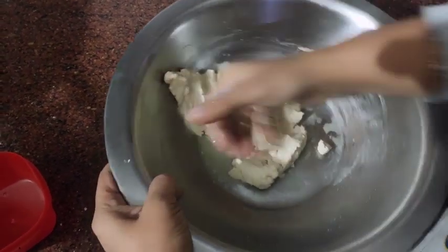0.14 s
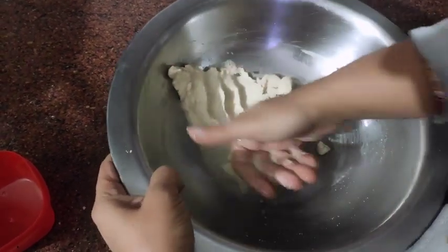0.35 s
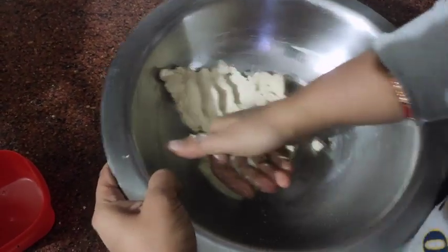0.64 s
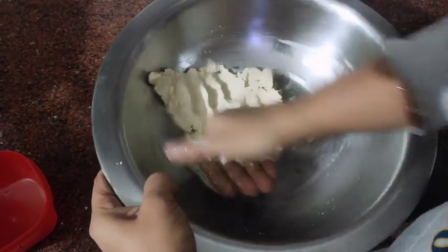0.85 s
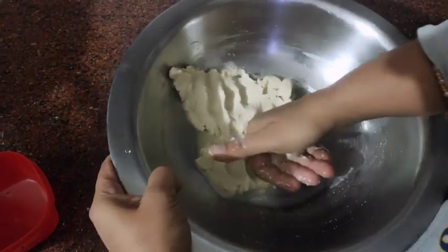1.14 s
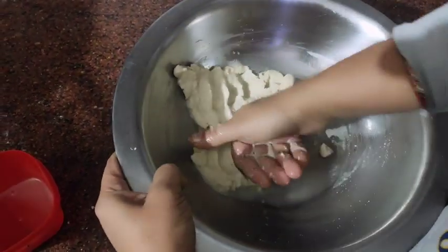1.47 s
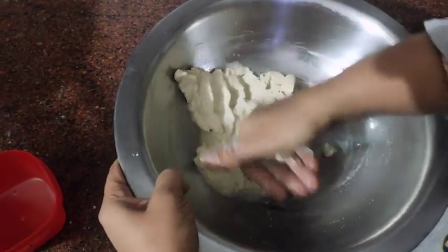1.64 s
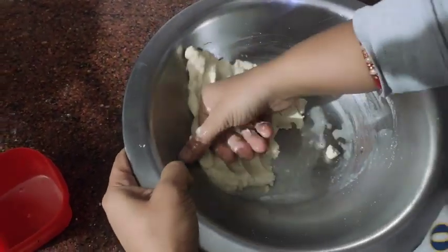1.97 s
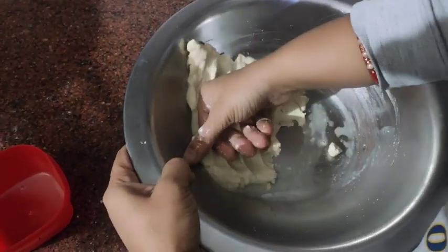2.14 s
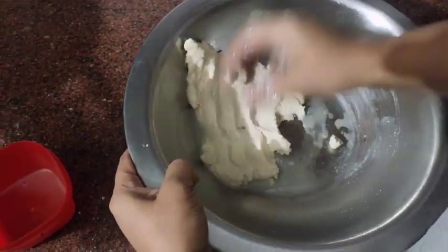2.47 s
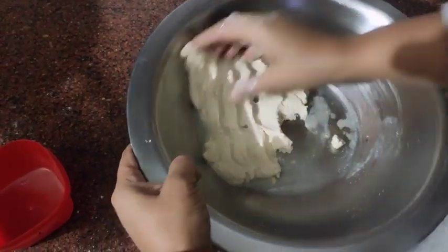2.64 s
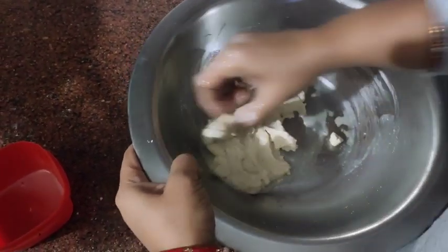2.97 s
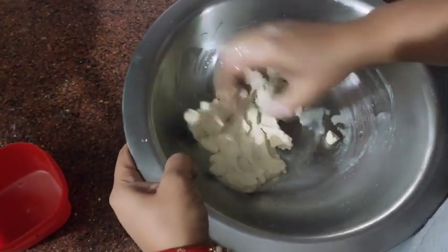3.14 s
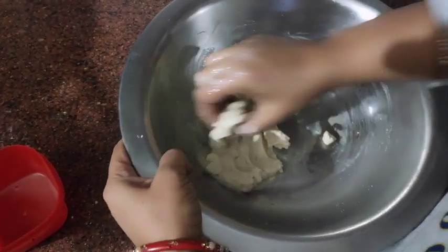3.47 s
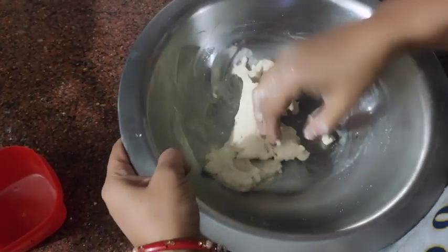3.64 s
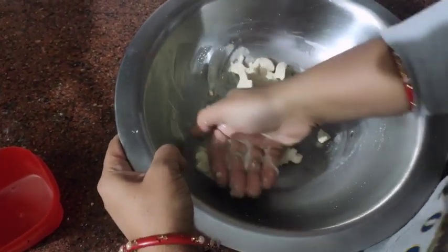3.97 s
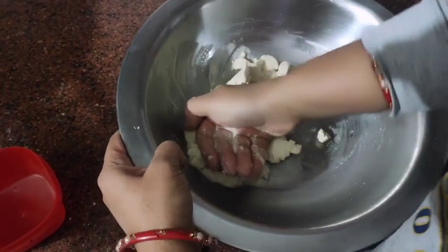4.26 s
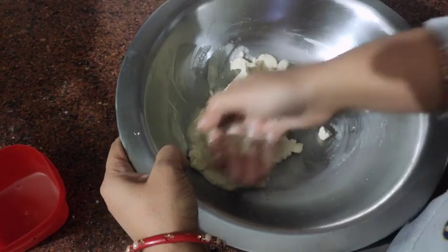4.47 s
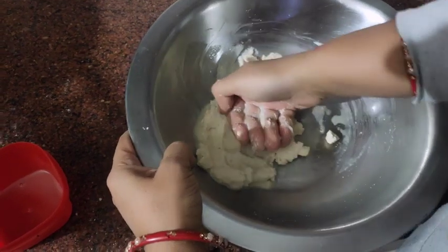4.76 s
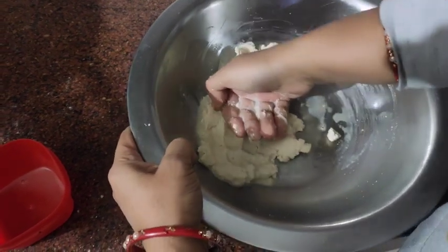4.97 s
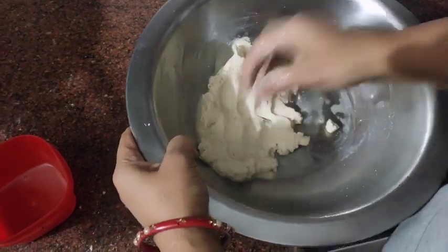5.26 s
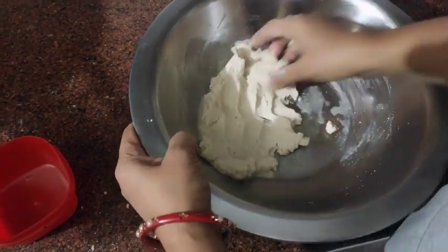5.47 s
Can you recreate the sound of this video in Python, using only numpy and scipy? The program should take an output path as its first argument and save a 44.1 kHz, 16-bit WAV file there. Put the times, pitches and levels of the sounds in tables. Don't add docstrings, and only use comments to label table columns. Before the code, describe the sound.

Bright, gritty back-and-forth scrubbing on steel about three strokes a second, with faint bowl skids, bangle ticks and one sharp wire snap.

```python
import sys
import numpy as np
from scipy import signal
from scipy.fft import rfft, irfft, next_fast_len
from scipy.io import wavfile
from scipy.ndimage import uniform_filter1d

SR = 44100
rng = np.random.default_rng(int(sys.argv[2]) if len(sys.argv) > 2 else 0)


def log_audio(samples):
    frames = np.atleast_2d(samples).T
    limited = np.clip(frames, -1, 1)
    pcm = np.round(limited * 32767).astype(np.int16)
    wavfile.write(sys.argv[1], SR, pcm)


def gain_from_db(level_db):
    decades = np.asarray(level_db, float) / 20
    return 10 ** decades


N = 247530

# (frequency [Hz], likeness [0-1])
ROOM_SAME = [(20, .92), (120, .75), (300, .7), (640, .35), (1400, 0)]


def evened(x):
    return x / np.sqrt(np.mean(x ** 2) + 1e-20)


def read(points, hz):
    f, value = np.transpose(points)
    return np.interp(np.log(hz + 1), np.log(f + 1), value)


def add(mix, s, sound):
    part = mix[round(s * SR):][:len(sound)]
    part += sound[:len(part)]


def band(x, lo_hz, hi_hz):
    return signal.sosfilt(signal.butter(2, [lo_hz, hi_hz], "band", fs=SR, output="sos"), x)


def high_pass(x, hz):
    return signal.sosfilt(signal.butter(4, hz, "high", fs=SR, output="sos"), x)


def drift(hz):
    noise = uniform_filter1d(rng.standard_normal(N), int(SR / hz / 4) + 1)
    return evened(signal.lfilter([1], [1, -np.exp(-2 * np.pi * hz / SR)], noise))


def resonate(x, modes, wander_db=0.):
    out = np.zeros_like(x)
    knots = rng.standard_normal((len(modes), 60))
    along = np.linspace(0, 59, N)
    for (hz, width, db), wander in zip(modes, knots):
        r = np.exp(-np.pi * width / SR)
        turn = r * np.cos(2 * np.pi * hz / SR)
        feed = np.interp(along, np.arange(60), gain_from_db(db + wander_db * wander))
        out += np.sqrt(2 * (1 - r * r)) * signal.lfilter([1, -turn], [1, -2 * turn, r * r], feed * x)
    return out


def ring(modes, rise_s):
    t = np.arange(SR // 4) / SR
    sines = sum(gain_from_db(db - 60 * t / t60) * np.sin(2 * np.pi * hz * t) for hz, db, t60 in modes)
    return sines * (1 - np.exp(-t / rise_s))


def patchy(patch_db, bins, frames):
    shape = (N // 128 + 6, 257)
    a, b, patch = rng.standard_normal(shape + (3,)).T
    patch = uniform_filter1d(patch, int(bins), 0)
    patch = evened(uniform_filter1d(patch, int(frames), 1))
    spectrum = (a + 1j * b) * gain_from_db(patch_db * patch)
    return evened(signal.istft(spectrum, nperseg=512, noverlap=384)[1][:N])


def coloured(x, gain):
    n = next_fast_len(N + 4096)
    return irfft(rfft(x, n) * gain(np.fft.rfftfreq(n, 1 / SR)), n)[..., :N]


def at_ports(shared, own, likeness):
    common = coloured(shared, lambda hz: read(likeness, hz))
    private = coloured(own, lambda hz: np.sqrt(1 - read(likeness, hz) ** 2))
    return np.array([shared, common + private])


def efforts(rows, rise_db_s, fall_db_s, rest_db):
    t = np.arange(0, N + 64, 64) / SR
    s, hold, db = np.transpose(rows)[:, :, None]
    early, late = np.maximum(s - t, 0), np.maximum(t - s - hold, 0)
    level = gain_from_db(db - rise_db_s * early - fall_db_s * late).sum(0)
    return np.interp(np.arange(N) / SR, t, level + gain_from_db(rest_db))


def tail(x, wet_db):
    # (frequency [Hz], t60 [s])
    echo_t60 = [(200, 0.33), (1000, 0.43), (4000, 0.18), (12000, 0.22)]
    grid = np.arange(200, SR // 2, 20)
    at = grid + rng.integers(0, 20, (2, len(grid)))
    taps = np.zeros((2, SR // 2 + 40))
    np.put_along_axis(taps, at, rng.choice([-1., 1.], at.shape), 1)
    hz, t, z = signal.stft(taps, SR, nperseg=256)
    same = read(ROOM_SAME, hz)[:, None]
    z[1] = same * z[0] + np.sqrt(1 - same ** 2) * z[1]
    fade = gain_from_db(-60 * t / read(echo_t60, hz)[:, None])
    decay = signal.istft(z * fade, SR, nperseg=256)[1]
    echo = signal.fftconvolve(x[None], decay / np.linalg.norm(decay[0]), axes=1)[:, :N]
    return gain_from_db(wet_db) * echo


def place(x, pan_db, lag, wet_db):
    left = gain_from_db(pan_db / 2) * np.roll(x, int(lag))
    right = gain_from_db(-pan_db / 2) * x
    return np.array([left, right]) + tail(x, wet_db)


def scouring(grit_db=-1.0, wet_db=-12, hand_echo=0.45):
    # (frequency [Hz], density [dB per Hz])
    scratch = [(530, -83), (900, -18), (1400, -24), (1580, -8.5), (1720, -13.5), (3310, -5.5), (3600, -7),
               (4010, -4), (4460, -2.5), (5280, 0), (6310, 0.5), (7280, -10), (8410, -24), (12700, -7.5),
               (15300, -4)]
    # (frequency [Hz], width [Hz], level [dB])
    pan_modes = [(2665, 19, -21.5), (2920, 22, -24.5), (3620, 210, -15.5), (4394, 19, -16.5),
                 (4680, 110, -17.5), (5300, 47, -40), (5647, 35, -17.5), (6133, 31, -9.5),
                 (6440, 46, -13.5), (6720, 154, -9.5), (6760, 70, -18), (7080, 72, -10.5),
                 (7255, 53, -16.5), (7480, 26, -48)]
    # (frequency [Hz], left minus right [dB])
    balance = [(60, -4), (110, 2), (200, -15), (380, -10), (700, 4), (1290, 0.5), (2380, 2.5), (4400, -1),
               (8120, 7), (15000, -1.5)]
    # (frequency [Hz], lead of the left [rad])
    lead = [(1500, -2), (2200, 0), (2800, 1.4), (3700, -1.2), (5000, 1), (7500, 1.5), (15000, 1.6)]
    # (frequency [Hz], likeness [0-1])
    pan_same = [(1500, .35), (2200, .6), (3100, .25), (3700, .65), (4600, .85), (5500, .45), (7000, .5),
                (9000, .2)]
    level_db, press_db, bite_db = strokes()
    grit = evened(gain_from_db(grit_db * drift(560) + 0.12 * drift(60)))
    shared, own = (grit * patchy(2.2, 3, 30) for _ in range(2))
    pair = at_ports(shared, own, pan_same)
    scrape = evened(coloured(pair, lambda hz: gain_from_db(read(scratch, hz))))
    scrape += band(resonate(pair, pan_modes, wander_db=1.5), 670, 18600)
    late = np.arange(N) - SR * (0.000914 + 0.00019 * drift(3.82))
    scrape += hand_echo * np.array([np.interp(late, np.arange(N), band(side, 770, 3770)) for side in scrape])
    sign = np.array([[.5], [-.5]])
    scrape = coloured(scrape, lambda hz: gain_from_db(sign * read(balance, hz)) * np.exp(1j * sign * read(lead, hz)))
    low = signal.sosfilt(signal.butter(2, 4500, fs=SR, output="sos"), scrape)
    bite = band(scrape, 3700, 5100)
    fizz = high_pass(scrape, 7600)
    fizz_gain = gain_from_db(-0.2 * (level_db + 39.5))
    scrape = scrape + (gain_from_db(press_db) - 1) * low + (gain_from_db(bite_db) - 1) * bite + (fizz_gain - 1) * fizz
    direct = gain_from_db(level_db) * evened(scrape)
    return direct + tail(direct[0], wet_db)


def strokes():
    # (start [s], level [dB], pressure on the low scrape [dB])
    returns = [(-0.09, -36, -3.5), (0.257, -28, 2), (0.541, -29, -2.5), (0.833, -26.5, 3.5),
               (1.136, -27.5, 0.5), (1.44, -26, 0), (1.74, -29.5, 0.5), (2.047, -29, -0.5),
               (2.355, -27.5, -1), (2.652, -27, -4.5), (2.955, -31.5, 0.5), (3.259, -30.5, -3),
               (3.557, -29.5, -4.5), (3.854, -29, 0.5), (4.151, -29.5, 0), (4.464, -31.5, 3),
               (4.755, -30.5, 3.5), (5.063, -33, 1), (5.364, -33, -3), (5.7, -38, 1.5)]
    # (start [s], level [dB], surge near the end [dB], pressure [dB])
    pushes = [(-0.01, -30.5, 3, 3), (0.408, -28, -1.5, 2.5), (0.631, -30, 1, -0.5),
              (0.9, -27.5, -0.5, -0.5), (1.213, -29, 1.5, 2.5), (1.511, -28.5, 0, -0.5),
              (1.823, -29.5, 1, 1.5), (2.131, -31, 2.5, 1), (2.428, -31, 4, 4), (2.728, -30.5, 1.5, 1.5),
              (3.039, -32, 2.5, 1.5), (3.353, -30.5, 2, 5.5), (3.642, -28, 2, 3), (3.946, -29, 0.5, 0),
              (4.244, -32, 3.5, 2.5), (4.553, -32.5, 3.5, -1.5), (4.851, -29.5, -1, 1),
              (5.152, -33, 2.5, 0.5), (5.457, -34, 8, 6)]
    # (share of the stroke [0-1], level against the stroke's [dB])
    return_shape = [(0, -13.5), (.14, -8.5), (.29, -5.5), (.49, -4.3), (.74, -7)]
    # (share of the stroke [0-1], level against the stroke's [dB])
    push_shape = [(0, -13.5), (.11, -4.5), (0.238, -2), (.49, -2.5)]
    bites = [3, -2, 1, -1.5, -2, 5.5, -1, 4.5, 1, 1.5, 1, 1, -2, 1.2, -2, 0.1, -0.3, 1, -1, 1, -3, 0.5, 0.1,
             3, -5, -2.5, -0.5, 1.5, -0.7, 0.5, -1.5, 0.1, -2.5, 3, -4, -0.5, -3.5, 4]
    surge_at, lift_at, lift_db = 0.75, 0.91, -8.5
    speed, press = [], []
    for this_return, this_push, (end, *_) in zip(returns, pushes, returns[1:]):
        back, back_db, back_press = this_return
        push, push_db, surge_db, push_press = this_push
        full_push = push_shape + [(surge_at, surge_db), (lift_at, surge_db + lift_db)]
        speed += [(back + at * (push - back), back_db + db) for at, db in return_shape]
        speed += [(push + at * (end - push), push_db + db) for at, db in full_push]
        press += [((back + push) / 2, back_press), ((push + end) / 2, push_press)]
    speed += [(returns[-1][0], returns[-1][1] + return_shape[0][1])]
    t = np.arange(N) / SR
    middle, press_db = np.transpose(press)
    level_db = uniform_filter1d(np.interp(t, *np.transpose(speed)), 300)
    return level_db, np.interp(t, middle, press_db), np.interp(t, middle, bites)


def catches(catch_db=-3):
    # (time [s], peak [dB], frequency [Hz])
    caught_wires = [(0.0428, -26, 6840), (0.135, -15, 6900), (0.183, -11, 7000), (0.2867, -24, 6800),
                    (0.3606, -17, 6810), (0.4294, -27, 6700), (0.5616, -20, 5710), (0.8485, -29, 6700),
                    (0.9423, -16, 6700), (1.1588, -23, 6140), (1.245, -20, 6900), (1.4516, -26, 5040),
                    (1.8387, -24, 6800), (1.8517, -24, 6100), (2.0767, -26, 6690), (2.147, -24, 6200),
                    (2.373, -30, 6800), (2.3775, -27, 6060), (2.4438, -33, 6150), (2.4618, -27, 6820),
                    (2.6065, -7, 6360), (2.6718, -23, 6100), (2.7561, -26, 6680), (2.8469, -29, 6950),
                    (2.8594, -21, 6620), (2.9646, -33, 6800), (2.9776, -20, 6530), (3.0729, -26, 6420),
                    (3.3697, -30, 6200), (3.3862, -25, 6000), (3.4336, -25, 6130), (3.6256, -26, 6200),
                    (3.7763, -14, 4960), (3.8801, -27, 5630), (3.9649, -29, 4330), (3.9763, -26, 6650),
                    (4.5715, -38, 7080), (4.7745, -24, 6420), (4.8828, -32, 7000), (4.9097, -20, 6640),
                    (5.1771, -33, 6200), (5.3916, -30, 6550)]
    out = np.zeros(N)
    for s, db, hz in caught_wires:
        wire = ring([(hz, 6, .009), (hz * 1.13, 0, .007)], .001)
        add(out, s - .001, gain_from_db(db + catch_db) * wire)
    return place(out, 3, lag=4, wet_db=-6)


def wire_snap():
    # (time [s], peak [dB])
    moment = (1.5319, -1)
    # (frequency [Hz], level [dB], t60 [s])
    wire_modes = [(4400, 2, .0028), (3650, -8, .006), (5250, -9, .006)]
    s, db = moment
    out = np.zeros(N)
    add(out, s, gain_from_db(db) * ring(wire_modes, .0004))
    return out * gain_from_db(np.array([[1.5], [-1.5]]))


def bowl():
    # (frequency [Hz], width [Hz], level [dB])
    body_modes = [(309, 24, -7.5), (418, 29, -3.5), (522, 56, 0), (580, 81, 5.5), (663, 97, -3),
                  (790, 400, -5), (902, 48, -8), (990, 55, -12), (1180, 250, -1), (1380, 190, -16),
                  (1650, 64, -29)]
    # (start [s], hold [s], rub [dB], brightness [dB])
    slides = [(0.0, 0.16, -47, -7.5), (0.31, .01, -53, 3), (0.595, 0.02, -66.5, 8.5), (0.87, 0.041, -72, 7),
              (1.095, 0.076, -56, -22), (1.425, 0.025, -58.5, -1.5), (1.967, 0.061, -59, -10),
              (2.05, 0.12, -49.5, -1), (2.307, 0.061, -50, -6.5), (2.633, 0.021, -47, 2.5),
              (2.747, 0.049, -60.5, 11.5), (3.1, 0.026, -79, 0), (3.312, 0.04, -54, 7.5),
              (3.377, 0.041, -50, -17), (3.643, 0.033, -62.5, 8), (3.945, 0.022, -65.5, 5),
              (4.145, 0.13, -46, -4.5), (4.403, .13, -59.5, 0), (4.683, 0.25, -69, 0),
              (5.108, 0.062, -55, 1.5), (5.43, 0.071, -54, 4), (5.476, 0.12, -51.5, 4)]
    # (start [s], hold [s], level [dB])
    skids = [
        (0.0, 0.12, -57.5),
        (2.03, 0.15, -57),
        (4.16, .2, -60),
        (5.41, 0.072, -47.5),
        (5.49, 0.14, -45),
    ]
    # (frequency [Hz], width [Hz], level [dB])
    floor_modes = [(609, 47, -3.5), (683, 73, 2), (760, 100, -2.5)]
    # (start [s], hold [s], thump [dB])
    leans = [(0.0, 0.1, -74), (0.34, 0.12, -61), (0.57, 0.016, -67), (0.87, 0.036, -59.5),
             (1.13, 0.036, -58.5), (1.55, 0.0097, -56), (2.22, 0.13, -65.5), (2.46, 0.022, -68),
             (2.64, 0.018, -57), (2.88, .02, -83), (3.1, .02, -82), (3.29, 0.071, -61), (3.58, 0.088, -62),
             (3.91, 0.017, -62), (4.02, .01, -79), (4.15, .1, -63), (4.33, 0.24, -65.5), (5.12, .02, -73),
             (5.44, 0.13, -57)]
    rise_db_s, fall_db_s, rest_db = 454, 167, -86.5
    grit = .35 + 6 * (rng.random(N) < 500 / SR)
    slips = gain_from_db(1.66 * drift(170)) * rng.standard_normal(N) * grit
    body = evened(resonate(slips, body_modes, wander_db=1.5))
    dull_rows = [(s, hold, db) for s, hold, db, _ in slides]
    bright_rows = [(s, hold, db + bright_db) for s, hold, db, bright_db in slides]
    deep = efforts(dull_rows, rise_db_s, fall_db_s, rest_db)
    bright = efforts(bright_rows, rise_db_s, fall_db_s, rest_db)
    rub = deep * band(body, 200, 570) + bright * high_pass(body, 570)
    song = evened(band(resonate(slips, floor_modes), 510, 1000))
    rub += efforts(skids, rise_db_s, fall_db_s, -120) * song
    weight = efforts(leans, rise_db_s=304, fall_db_s=167, rest_db=-100)
    thump = weight * evened(band(rng.standard_normal(N), 77, 260))
    return place(rub + knocks(), -5, lag=8, wet_db=-7) + thump


def knocks():
    # (time [s], peak [dB], brightness [dB], depth [dB], rattle t60 [s])
    blows = [(0.863, -43.5, 1, -17, 0.21), (1.059, -50, 2, -18, 0.38), (1.527, -44, 2, -14.5, 0.31),
             (2.039, -53, 2, -12, 0.24), (2.607, -36.5, -15, -1, 0.18), (2.612, -36.5, 4, -2.5, 0.11),
             (3.278, -36, -4.5, -7, 0.39), (3.577, -59, -21, -2, 0.17), (3.9, -55, 2.5, -16, 0.57),
             (4.131, -48.5, -15, -21, 0.17), (4.38, -46, 0, -22, 0.27), (4.5, -47, 2, -27, 0.26),
             (4.907, -49, -12, -26, 0.36), (5.1, -45.5, -2, -38, 0.11), (5.393, -31.5, -9, -7, 0.086)]
    # (frequency [Hz], level [dB], t60 [s])
    base_modes = [(206.5, -8, 0.13), (318.3, 7.5, 0.22), (341, -1, 0.1), (433, -13, 0.25)]
    # (frequency [Hz], level [dB], t60 [s])
    belly_modes = [(511, -4, 0.24), (552, -2.5, 0.14), (603, 3.5, 0.083), (650, -6.5, 0.19),
                   (733, -11, 0.22)]
    # (frequency [Hz], level [dB], t60 [s])
    wall_modes = [(818, -18, 0.36), (885, -8.5, 0.052), (980, -9, 0.24), (1170, -10.5, 0.19),
                  (1406, -6.5, 0.25), (1500, -23, 0.25), (1822, 0, 0.19)]
    out, t = np.zeros(N), np.arange(SR // 4) / SR
    chance = rng.standard_normal((len(blows), len(t)))
    for (s, db, bright_db, deep_db, t60), noise in zip(blows, chance):
        base, belly, wall = ([(hz * (1 + 0.008 * u), d, d60 * t60 / 0.31) for (hz, d, d60), u in zip(modes, noise)]
                             for modes in (base_modes, belly_modes, wall_modes))
        fade = gain_from_db(-60 * t / max(t60, .02)) * (1 - np.exp(-t / 0.0027))
        low = ring(base, 0.0081) + 1.8 * band(noise, 240, 330) * fade
        high = ring(wall, 0.0019) + 2.17 * band(noise, 810, 1800) * fade
        blow = ring([(680, 6, .016)], .001)
        knock = blow + ring(belly, 0.005) + gain_from_db(deep_db + 1.5) * low + gain_from_db(bright_db) * high
        add(out, s - .0005, gain_from_db(db) * knock)
    return out


def bangle():
    # (time [s], peak [dB], click above it
    # [dB], rim ring above it [dB], pitch factor of the spot hit)
    taps = [(0.116, -32.5, 12, -14.5, 1), (0.168, -34.5, 10, -20, 1.13), (0.292, -33, 13, -19, 1.04),
            (0.382, -29, 15, -22, 1.04), (0.452, -56, 10, -1.5, 1.1), (0.578, -39, 18, -22, 1.05),
            (0.850, -34, 12.5, -20, 1.04), (1.059, -38, 20.5, -16, 1.11), (1.525, -44, -5, -22, 0.91),
            (2.289, -35, 11, -24, 1.01), (2.479, -45.5, 7, -23, 1), (2.612, -29.5, -20, -20, 0.88),
            (2.778, -30.5, 3.5, -21, 1.01), (2.869, -35, -20, -21, 1.14), (2.97, -56, -24, -18, 1.6),
            (2.983, -38, -13, -18, 1), (3.112, -42, -6, -18, 1.03), (3.280, -33, -17, -20, 1.05),
            (3.402, -28, 8.5, -19, 1.04), (3.639, -39.5, 15, -16, 1.05), (3.693, -37.5, 8, -23, 1.01),
            (3.822, -48, 0, -19, 1), (3.933, -39.5, 16, -27, 1.38), (3.952, -42, 20, -18, 1.17),
            (4.486, -63, 5, -20, 1.8), (4.501, -40.5, 11, -11.5, 1.07), (4.522, -40.5, 10, -12, 1.1),
            (4.95, -48, 9, -21, 0.7), (5.138, -35, 8, -18, 1.05), (5.186, -42, 8, -24, 0.95),
            (5.371, -48, -8, -22, 1.14), (5.394, -36, -20, -20, 0.84), (5.458, -41, -6, -24, 1.04),
            (5.477, -30, 3.5, -15, 1.09), (5.585, -33.5, 9, -18, 1.09)]
    # (frequency [Hz], level [dB], t60 [s])
    rim_modes = [(1010, 3, 0.018), (1150, -5, .013), (1330, -17, 0.02)]
    # (frequency [Hz], t60 [s])
    clear_ring = (923, .2)
    # (frequency [Hz], level [dB], t60 [s])
    bangle_modes = [(3350, 8, 0.016), (3620, 0.5, 0.019), (3000, 6, 0.01), (4280, -1.5, 0.012)]
    ring_hz, ring_t60 = clear_ring
    rim, tick = np.zeros((2, N))
    chance = rng.uniform(-1.58, 1, (len(taps), 5))
    for (s, db, click_db, ring_db, spot), spread in zip(taps, chance):
        struck = [(hz * spot, d, t60) for hz, d, t60 in rim_modes] + [(ring_hz, ring_db, ring_t60)]
        add(rim, s - .0005, gain_from_db(db + 8) * ring(struck, .002))
        pitch = 1 + 0.025 * spread[4]
        own = [(hz * pitch, d + 4 * u, t60) for (hz, d, t60), u in zip(bangle_modes, spread)]
        add(tick, s - .001, gain_from_db(db + click_db) * ring(own, 0.0044))
    return place(rim, 2.0, lag=9.1, wet_db=-12) + place(tick, 7.0, lag=11.0, wet_db=-2)


def kitchen():
    # (frequency [Hz], density [dB per Hz])
    air_colour = [(18, -51), (30, -3.5), (188, -2.5), (244, -4.5), (292, -3), (349, -5), (544, -4),
                  (767, -15), (949, -24), (1290, -39), (1500, -19), (1950, -21), (3300, -120)]
    # (frequency [Hz], level [dB])
    hum_tones = [(297, -71), (96, -83.5)]
    shared, own = rng.standard_normal((2, N))
    pair = at_ports(shared, own, ROOM_SAME)
    air = gain_from_db(-68.5) * evened(coloured(pair, lambda hz: gain_from_db(read(air_colour, hz))))
    t = np.arange(N) / SR
    hum = np.zeros(N)
    for hz, db in hum_tones:
        level = gain_from_db(db + 0.85 * drift(4.4)) * np.sqrt(2)
        hum += level * np.sin(2 * np.pi * hz * t + 0.1 * drift(9.0))
    return air + hum * gain_from_db(np.array([[-1.5], [1.5]]))


def scene():
    return scouring() + catches() + wire_snap() + bowl() + bangle() + kitchen()


def top_cut(x):
    return signal.sosfilt(signal.butter(12, 16830, fs=SR, output="sos"), x)


def record(dry):
    hz, t, z = signal.stft(dry, SR, nperseg=2048, noverlap=1024)
    hz = hz[:, None]
    power = uniform_filter1d((abs(z) ** 2).mean(0), size=5, axis=0)
    power = uniform_filter1d(power, size=2, axis=1)
    around = uniform_filter1d(power, size=40, axis=0)
    around = uniform_filter1d(around, size=2, axis=1)
    under_db = 10 * np.log10(power / around + 1e-9) + 5.4
    under_db = under_db - 2.7 * (abs(hz - 10200) < 2300)
    shut = 1 / (1 + np.exp(np.minimum(under_db / .2, 50)))
    z = z * gain_from_db(-20 * shut * (hz > 900))
    z = z * (hz / 60) ** 2 / (1 + (hz / 60) ** 2)
    gated = signal.istft(z, SR, nperseg=2048, noverlap=1024)[1][:, :N]
    edge = signal.firwin(511, 15620, window=("kaiser", 9), fs=SR)
    limited = signal.oaconvolve(gated, edge[None], "same")
    return top_cut(limited)


dry = scene()
out = record(dry)
log_audio(out)
```